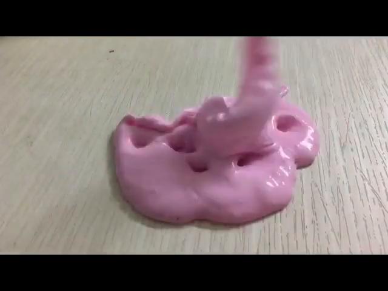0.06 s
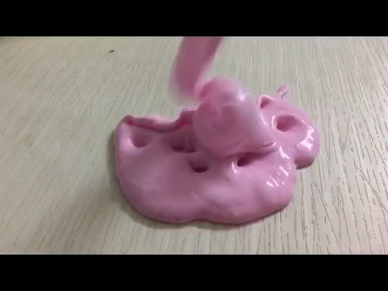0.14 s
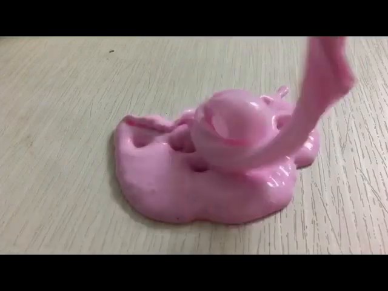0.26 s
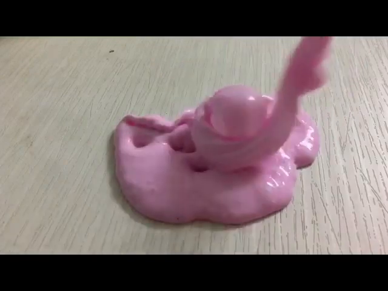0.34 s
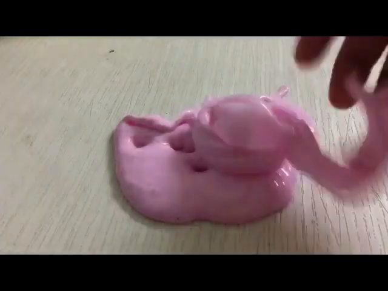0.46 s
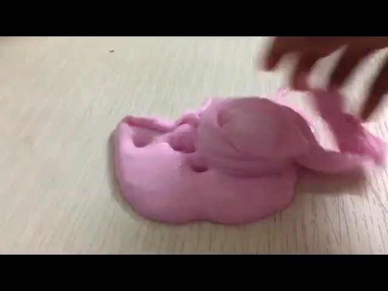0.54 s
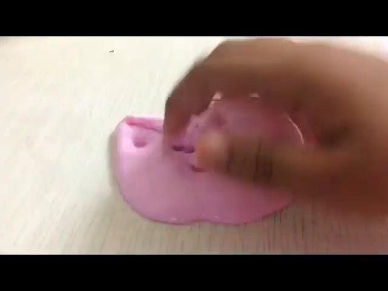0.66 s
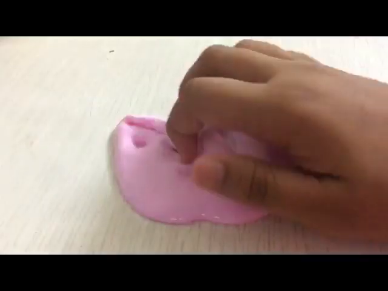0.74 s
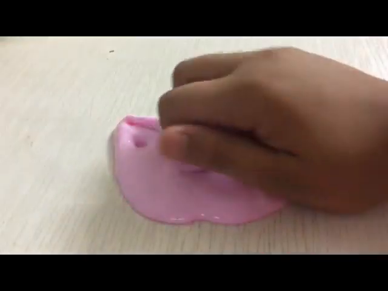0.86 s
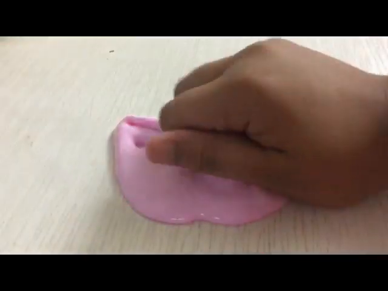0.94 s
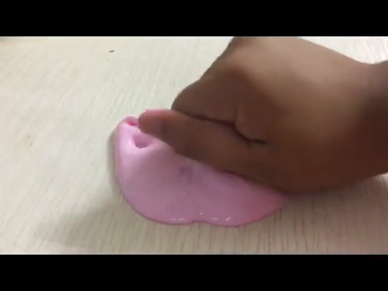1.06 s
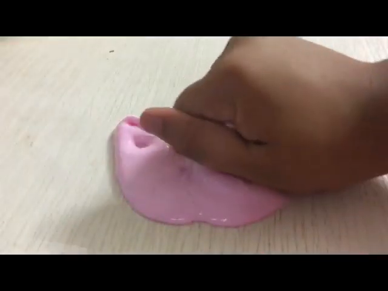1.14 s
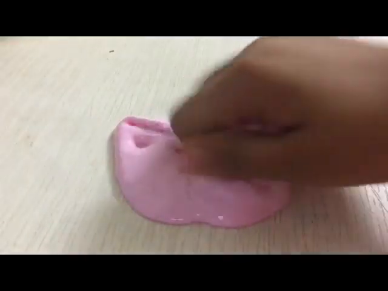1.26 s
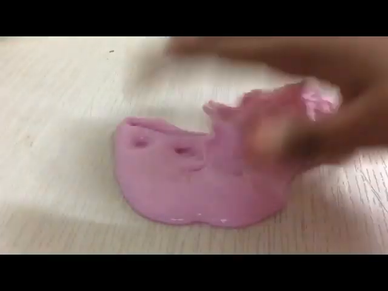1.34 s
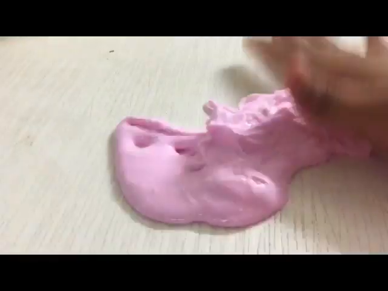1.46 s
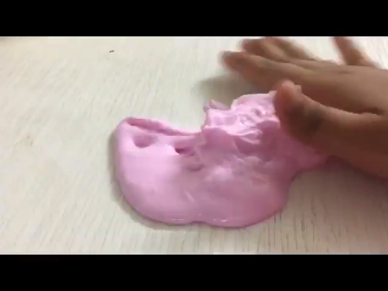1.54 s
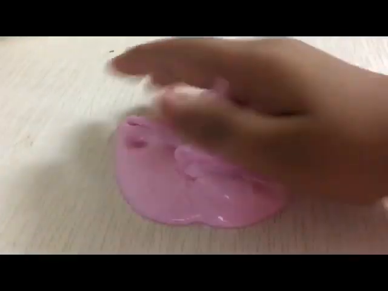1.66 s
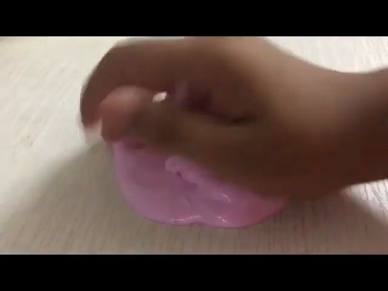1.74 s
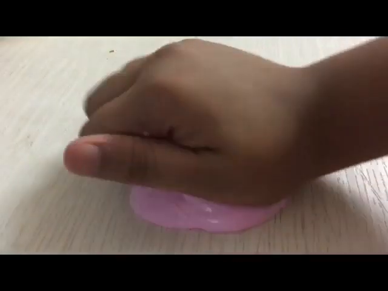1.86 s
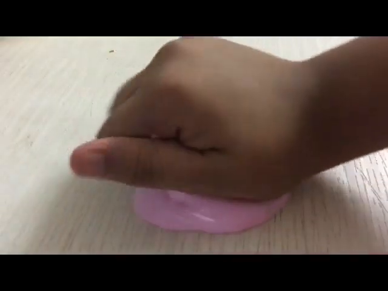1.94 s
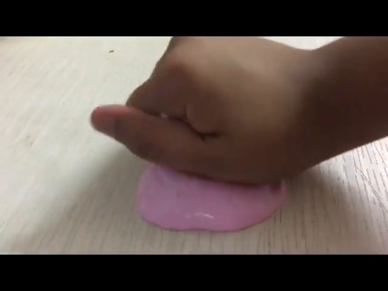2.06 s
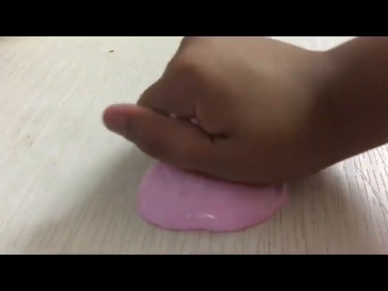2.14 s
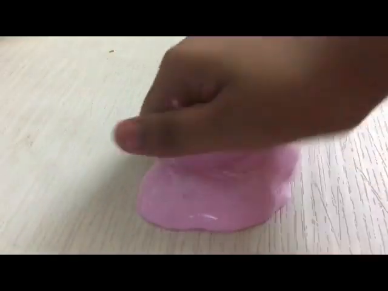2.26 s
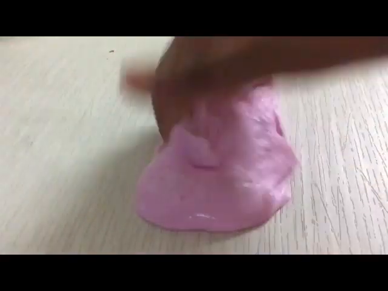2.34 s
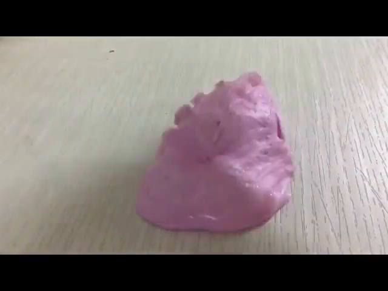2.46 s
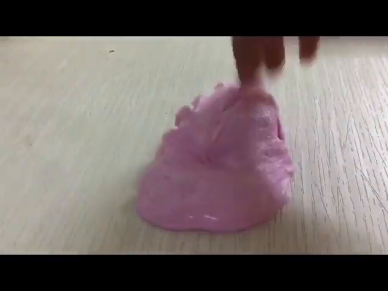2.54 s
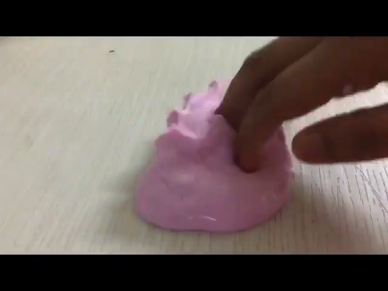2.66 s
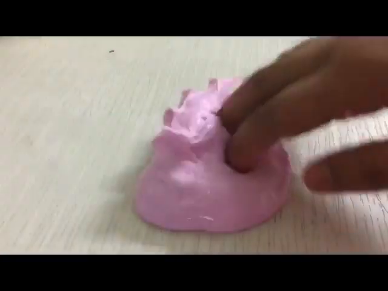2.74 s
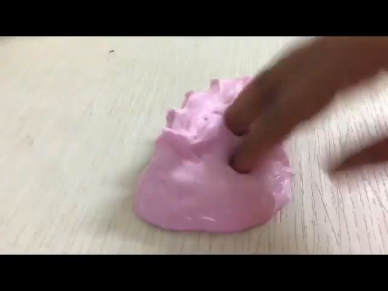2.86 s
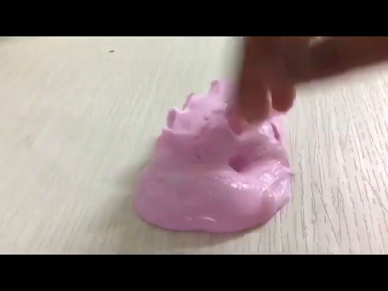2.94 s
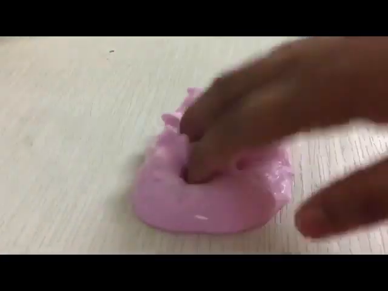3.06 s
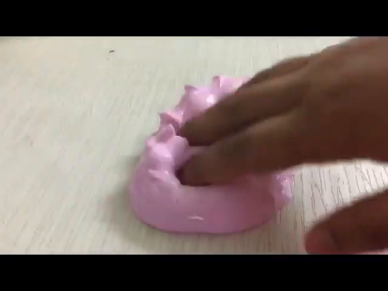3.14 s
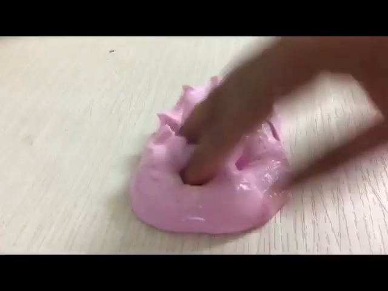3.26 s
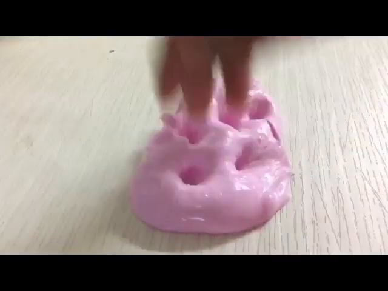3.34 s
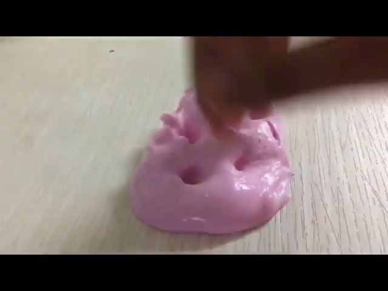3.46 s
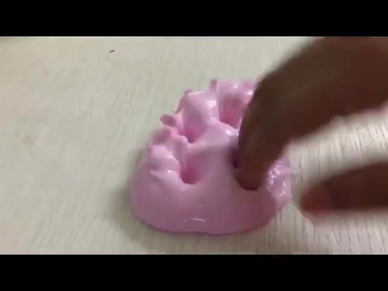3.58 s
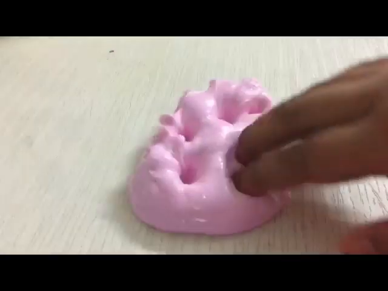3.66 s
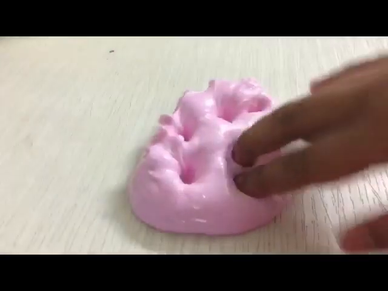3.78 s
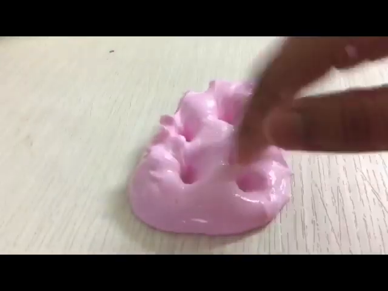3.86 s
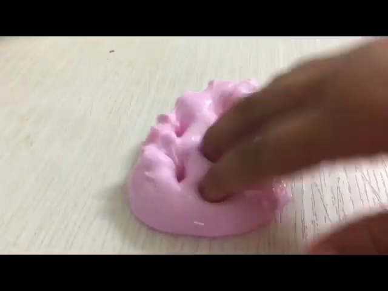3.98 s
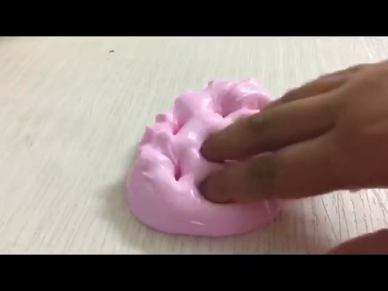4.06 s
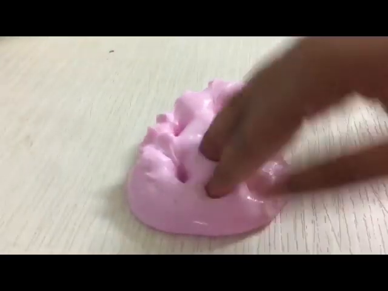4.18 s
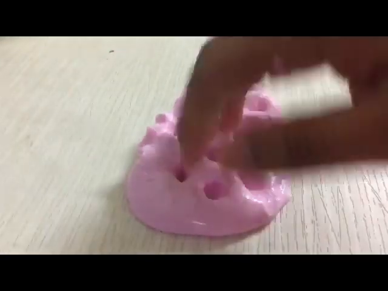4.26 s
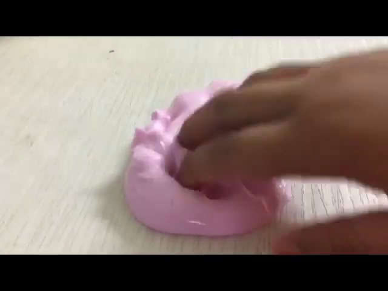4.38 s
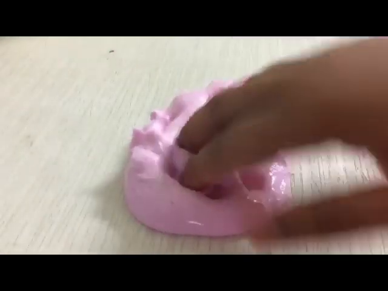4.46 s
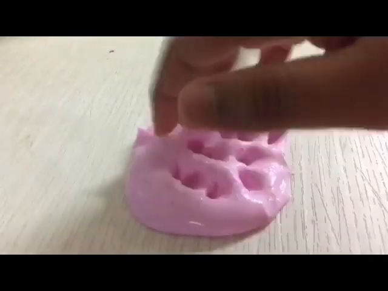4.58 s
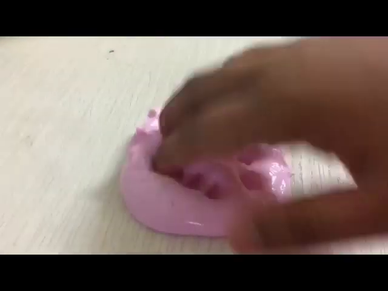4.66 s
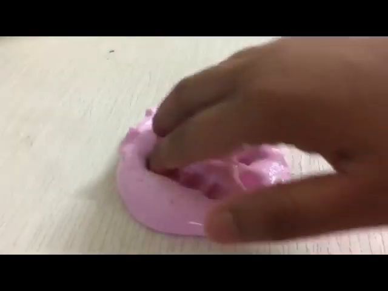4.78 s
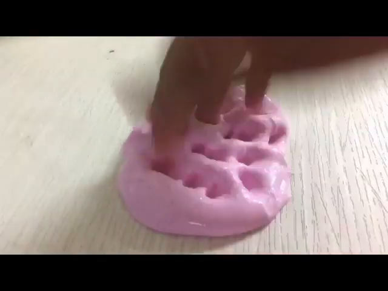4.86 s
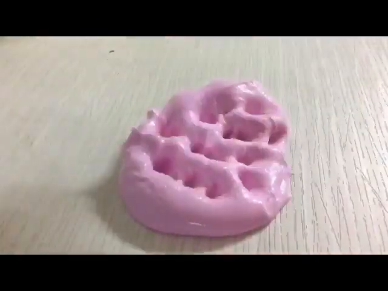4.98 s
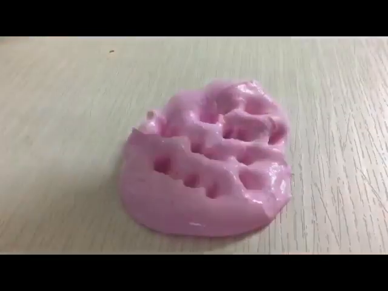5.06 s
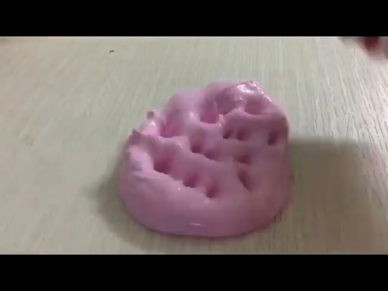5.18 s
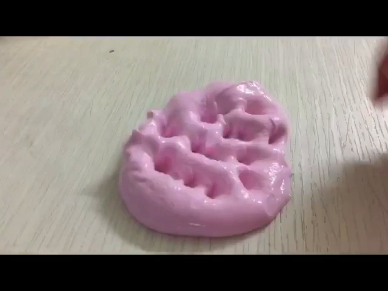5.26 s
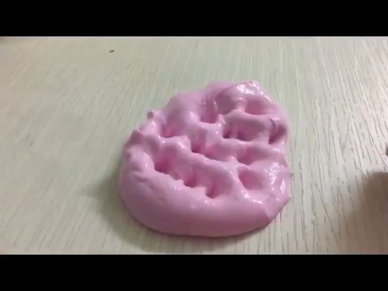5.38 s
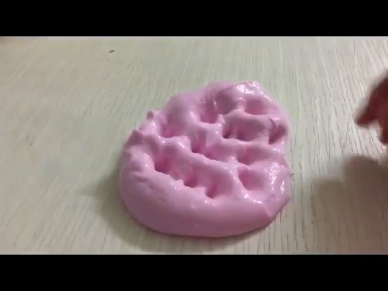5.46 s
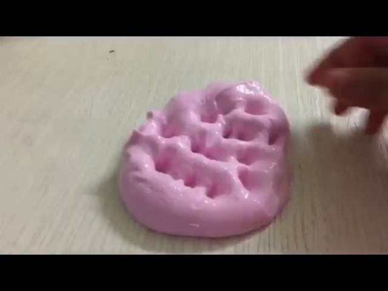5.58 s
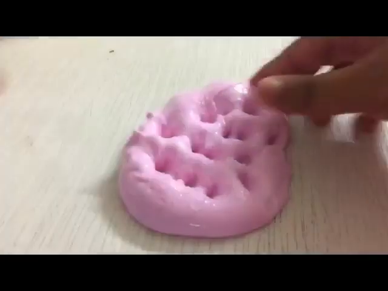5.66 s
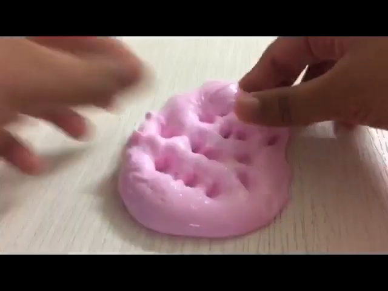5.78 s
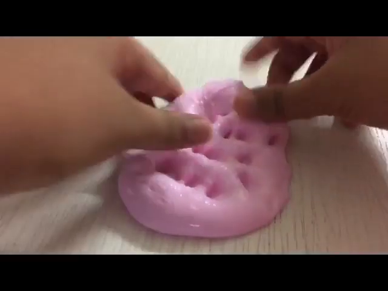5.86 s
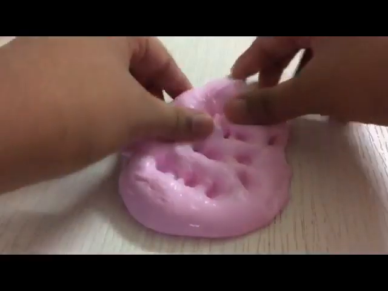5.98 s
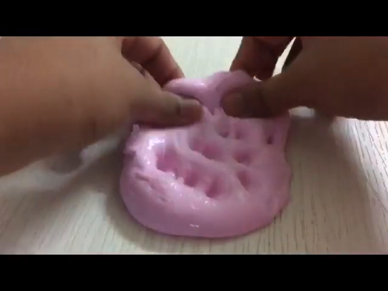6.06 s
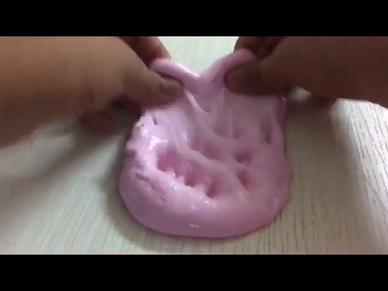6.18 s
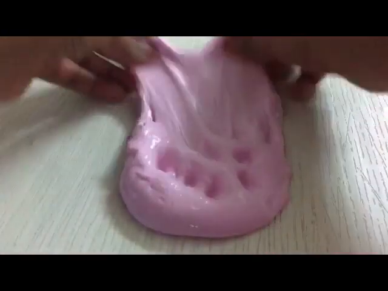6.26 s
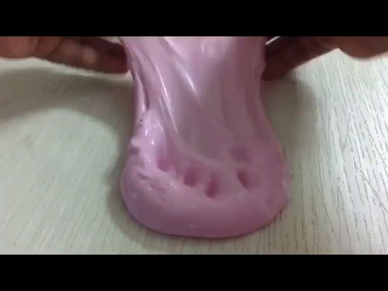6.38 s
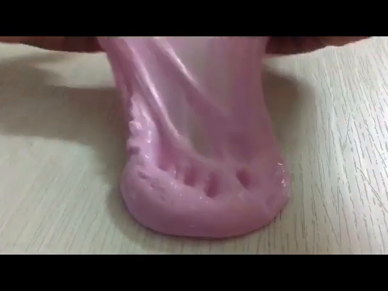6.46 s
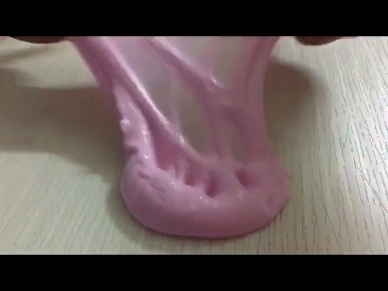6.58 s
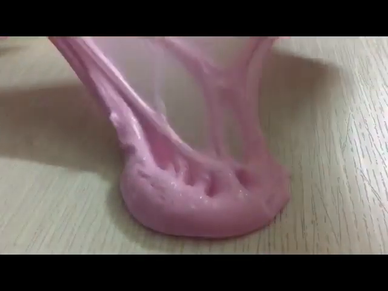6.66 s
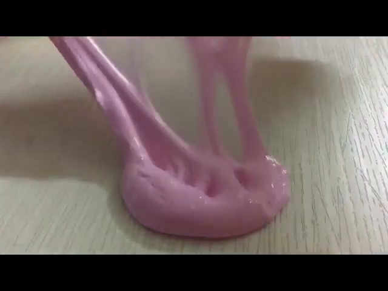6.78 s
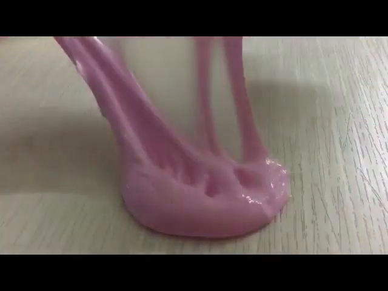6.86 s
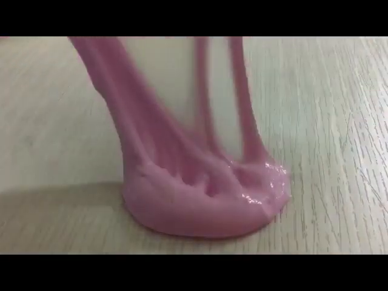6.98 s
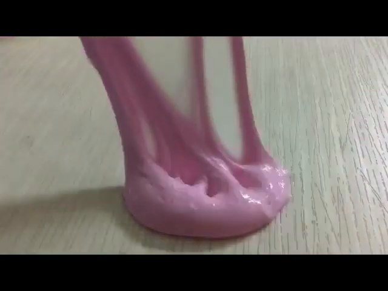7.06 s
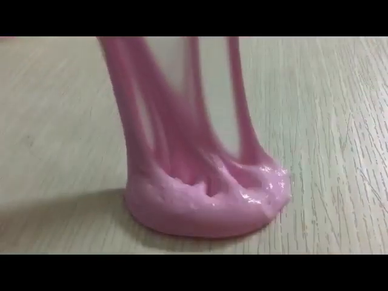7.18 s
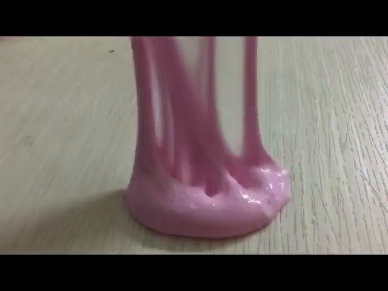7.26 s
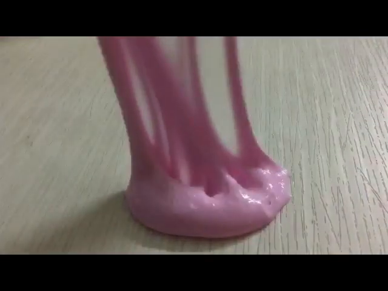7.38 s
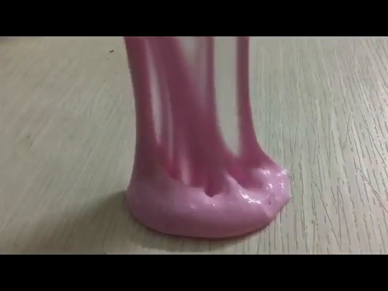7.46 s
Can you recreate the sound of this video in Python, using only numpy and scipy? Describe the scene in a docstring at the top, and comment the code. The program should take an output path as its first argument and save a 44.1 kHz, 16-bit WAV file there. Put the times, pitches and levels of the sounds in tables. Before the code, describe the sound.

Very close to the microphone in a small hard room, a hand slaps soft slime on a table and squeezes it, bursting a dense cluster of crisp air pops. A second squeeze crackles about a second later. Then fingers poke it with short hollow wet pops, spaced apart. Finally faint ticks and sticky peeling as it is stretched, over soft low hum and hiss.

```python
"""Fingers squeeze, poke and stretch soft slime on a table, close to one microphone in a small hard room.
Air pockets burst as torn noise; hollow pops snap and ring as short damped sines that sink in pitch.
Sticky skin peels with a fizz of random impulses, air hisses and squeaks as shaped noise,
and hands knock the table with falling sines and low rumble; machine hum and hiss, made of
filtered noise, lie under it all."""
import sys
import numpy as np
from scipy import signal
from scipy.fft import rfft, irfft
from scipy.io import wavfile

SR = 44100
rng = np.random.default_rng(int(sys.argv[2]) if len(sys.argv) > 2 else 0)


def unload_audio(sound):
    """Save the sound as a 16-bit wav file, at the path given as the first command line argument."""
    columns = np.transpose(np.atleast_2d(sound))
    # keep every value between -1 and 1, then stretch to whole-number steps
    steps = np.round(np.clip(columns, -1, 1) * 32767)
    wavfile.write(sys.argv[1], SR, steps.astype(np.int16))


def to_linear_factor(level_db):
    """Convert decibel levels (scalar or array-like) to linear amplitude factors."""
    exponent = np.asarray(level_db, float) / 20
    return 10 ** exponent


N = 331632


def rms_one(x):
    """Energy normalisation: scale to rms 1."""
    return x / np.sqrt(np.mean(x ** 2) + 1e-20)


def peak_one(x):
    """Amplitude normalisation: scale to peak 1."""
    return x / np.abs(x).max()


def at_hz(points, hz):
    """Logarithmic frequency scale: interpolate a (Hz, value) table along it."""
    table_hz, values = np.array(points).T
    return np.interp(np.log(hz), np.log(table_hz), values)


def band(x, low_hz, high_hz):
    """Band limiting by a Butterworth band-pass, flat between its edges."""
    edges_hz = [low_hz, min(high_hz, .45 * SR)]
    return signal.sosfilt(signal.butter(2, edges_hz, "band", fs=SR, output="sos"), x)


def coloured(x, spectrum):
    """Spectral shaping: weight a noise by frequency, then scale to rms 1."""
    hz = np.maximum(np.arange(N // 2 + 1) * SR / N, 1)
    return rms_one(irfft(rfft(x) * to_linear_factor(at_hz(spectrum, hz)), N))


def drift(rate_hz):
    """Low-passed random fluctuation: white noise through two equal poles, spread about 1."""
    step = 40  # samples between drawn values
    pole = np.exp(-2 * np.pi * rate_hz * step / SR)
    white = rng.standard_normal(N // step + 2002)
    slow = signal.lfilter([1], [1, -2 * pole, pole * pole], white)[2000:]  # settled part
    return np.interp(np.arange(N) / step, np.arange(len(slow)), rms_one(slow))


# spectrum of the room rumble, relative: pitch_hz, density_db [dB per Hz]
RUMBLE_SPECTRUM = [(15, -60.5), (25, -4.5), (102, -1.5), (147, 0.5), (167, -18.5), (200, -0.5), (220, -11),
                   (295, -7), (390, -17.5), (700, -51), (910, -50.5), (1540, -120)]
# spectrum of the room and microphone hiss, relative: pitch_hz, density_db [dB per Hz]
HISS_SPECTRUM = [(290, -48.5), (500, -4.5), (605, -0.5), (822, -5.5), (885, -1), (1120, 1), (1680, -0.5),
                 (1870, -6.5), (3110, -13.5), (4970, -42), (10300, -32), (15100, -15.5), (16500, -24.5)]
# wavering hum and whine: pitch_hz, width_hz, level_db [rms]
HUM_TONES = [(96.2, 8, -61.5), (117.9, 11, -63.5), (197.3, 8, -61.5), (296.9, 14, -69), (838, 16, -73.5),
             (1670, 14, -73.5), (14960, 27, -87), (15060, 25, -91)]
RUMBLE_DB, HISS_DB = -54.5, -62  # rms


def background():
    """Stationary noise: broad rumble and hiss, with narrow bands heard as wavering tones."""
    rumble_level = to_linear_factor(RUMBLE_DB + drift(4))
    out = rumble_level * coloured(rng.standard_normal(N), RUMBLE_SPECTRUM)
    out += to_linear_factor(HISS_DB) * coloured(rng.standard_normal(N), HISS_SPECTRUM)
    for hz, width_hz, level_db in HUM_TONES:
        tone = band(rng.standard_normal(N + SR), hz - width_hz / 2, hz + width_hz / 2)
        out += to_linear_factor(level_db) * rms_one(tone[SR:])  # the filter has settled after 1 s
    return out


# level of the faint treble hiss, rising and falling in steps: time_s, level_db
FAINT_HISS = [(0, -76), (.5, -72), (.8, -71.5), (1.3, -65.5), (1.55, -66.5), (2.05, -69), (2.25, -61.5),
              (2.55, -65), (2.59, -76.5), (2.92, -73), (3.08, -64.5), (3.3, -66.5), (3.75, -66.5),
              (3.85, -74), (4.0, -74.5), (4.24, -73.5), (4.4, -65.5), (4.9, -66.5), (5.12, -65),
              (5.38, -65.5), (5.42, -71.5), (6.3, -69), (6.7, -72.5), (7.52, -75.5)]
# tint of the faint hiss: pitch_hz, gain_db
FAINT_HISS_TINT = [(1060, 1.5), (3700, -7), (7400, -3.5), (12600, -1.5)]
# air hissing out of the squeezed lump, sudden and dying away:
# start_s, level_db, centre_hz, fade_db_per_s
JETS = [(1.06, -24, 12570, 901), (1.109, -30, 7010, 160.), (2.114, -26, 7500, 163)]
# sticky skin parting from slime: start_s, length_s, level_db [at 4 kHz], brightness_db_per_octave
PEELS = [(.600, 0.023, -71, 0), (.880, 0.15, -65, 6), (1.330, .035, -48, -0.3), (1.361, 0.029, -46, -0.8),
         (1.600, 0.082, -65, 0.5), (2.328, 0.061, -53, 3), (2.388, 0.069, -55, 0), (5.932, .015, -64.5, 1),
         (3.888, 0.011, -63, 1), (4.952, 0.011, -59.5, 0.6), (5.700, .12, -72, -0.6),
         (6.340, 0.079, -65.5, 1.6), (6.150, .17, -75, 5), (6.537, .065, -79.5, 5),
         (6.881, .22, -78.5, 2.5)]
JET_RISE_DB_PER_S, JET_SLOPE_DB_PER_OCTAVE = 3500.5, 10  # the slope falls away from the centre
PEEL_RISE_DB_PER_S, PEEL_FALL_DB_PER_S = 701.5, 603


def hissing_db(hz):
    """Incoherent addition: powers of faint hiss, air jets and peels sum to a level at one pitch."""
    t = np.arange(N) / SR
    power = to_linear_factor(2 * (np.interp(t, *np.transpose(FAINT_HISS)) + at_hz(FAINT_HISS_TINT, hz)))
    for start, level_db, centre_hz, fade in JETS:
        away_db = JET_SLOPE_DB_PER_OCTAVE * abs(np.log2(hz / centre_hz))
        edge_db = np.maximum(fade * (t - start), JET_RISE_DB_PER_S * (start - t))
        power = power + to_linear_factor(2 * (level_db - away_db - edge_db))
    for start, length, level_db, bright in PEELS:
        before_db = PEEL_RISE_DB_PER_S * (start - t)
        after_db = PEEL_FALL_DB_PER_S * (t - start - length)
        edge_db = np.maximum(0, np.maximum(before_db, after_db))
        power = power + to_linear_factor(2 * (level_db + bright * np.log2(hz / 4000) - edge_db))
    return 10 * np.log10(power)


# limits of the adjoining peel bands: edge_hz
PEEL_EDGES = (450, 2500, 5500, 10000, 16000)
THREADS_PER_S = (990, 1800, 2900, 2490)  # per band, before clumping
SWELL_DB = 1.8  # hard peeling comes in uneven swells


def peeling():
    """Random impulse process: tiny threads snap in clumps as skin and slime part, amid faint hiss."""
    out, clumps, swells = 0, drift(110), drift(44)
    for low_hz, high_hz, per_s in zip(PEEL_EDGES, PEEL_EDGES[1:], THREADS_PER_S):
        level_db = hissing_db(np.sqrt(low_hz * high_hz))
        born = rng.random(N) < per_s * to_linear_factor(2.0 * clumps) / SR
        strength = to_linear_factor(2.8 * np.minimum(rng.exponential(1, N), 5))
        threads = born * strength * rng.choice([-1, 1], N)
        # faint hiss is smooth, hard peeling crackles
        wet = np.clip((level_db + 72.5) / 15, 0, 1)
        smooth = np.sqrt(1 - 0.97 * wet ** 2) * rng.standard_normal(N)
        mixed = wet * rms_one(threads) + smooth
        moving_db = level_db + 0.86 * drift(30) + SWELL_DB * wet * swells
        out = out + to_linear_factor(moving_db) * rms_one(band(mixed, low_hz, high_hz))
    return out


def tearing(draw, tear_ms):
    """Film rupture: noise swells for 2 ms, then snaps, and the film gives way in uneven jerks."""
    t = np.arange(draw.shape[1]) / SR - .002
    lead_in = .17 * np.exp(t / .0012)
    snap = np.exp(-np.abs(t) / .00015)
    yielding = .32 * np.exp(-np.abs(t) / (tear_ms * .0011))  # time constant 1.1 times tear_ms
    uneven = draw[0] * np.exp(.5 * draw[1])
    tear = uneven * np.where(t < 0, lead_in, snap + yielding)
    tear[88:90] += [4.6, -4.6]  # click of the snap itself
    return tear


def loudness_one(x):
    """Short-time energy: scale so that the 2.5 ms round the snap have rms 1."""
    return x / np.sqrt(np.mean(x[78:188] ** 2))


# pockets bursting in the kneading fist:
# start_s, treble_db [snap], dullness_db [2-6 kHz over the snap], centre_hz [snap],
# tear_ms [scale of the tearing time]
BURSTS = [(0.551, -55, -8, 11000, 1.1), (0.6157, -46, -11, 12700, 1.2), (0.6222, -52, -10, 14300, 1.3),
          (0.8644, -46.5, -4.5, 6300, 0.8), (0.9433, -46, 5, 12500, 1.7), (0.9631, -44.5, 9, 5460, 0.9),
          (1.05, -37.5, 9, 5330, 1.1), (1.0575, -22, 5, 6900, 3.0), (1.0605, -21.5, -14, 5630, 2.1),
          (1.0677, -23.5, -3, 7750, 2.5), (1.0759, -26, -5, 6780, 1.4), (1.0957, -35, 6, 5270, 1.9),
          (1.1026, -17.5, 1.5, 14340, 0.7), (1.1087, -17.5, -13, 14300, 0.8), (1.117, -22, 6.5, 5810, 0.9),
          (1.1245, -18.5, -15.5, 5875, 0.9), (1.1375, -27, -20.5, 5660, 1.1),
          (1.1431, -24.5, -27, 13830, 3.0), (1.1463, -18.5, -15, 13640, 1.5), (1.1551, -22, -13, 6980, 0.7),
          (1.1888, -28.5, 0, 14410, 1.6), (1.2302, -16.5, -13.5, 14500, 1.3),
          (1.247, -19, -14.5, 14740, 0.6), (1.4048, -39, -18, 14240, 2.1), (1.4584, -52, -3.5, 13600, 2.2),
          (1.5722, -47.5, 0, 5500, 4.4), (1.6795, -56, -12, 10500, 3.0), (1.7165, -51.5, -12, 11000, 3.0),
          (1.7959, -50.5, -12.5, 13700, 0.9), (1.924, -46.5, -12.5, 14700, 0.8),
          (1.9867, -33, -16.5, 13400, 0.9), (2.0168, -41.5, -9, 14100, 0.6),
          (2.0781, -40.5, -15.5, 12900, 1.1), (2.0866, -50, -2.5, 5430, 2.3),
          (2.0983, -50.5, 5.5, 5500, 2.8), (2.1099, -13.5, -4.5, 7500, 2.8), (2.123, -16.5, -20, 7500, 1.2),
          (2.1268, -24, -6.5, 7400, 1.1), (2.1358, -21.5, -7.5, 14300, 0.9),
          (2.1446, -22.5, -5, 14420, 1.7), (2.1623, -17.5, -6.5, 7700, 0.7), (4.036, -56.5, -8, 12100, .9),
          (5.711, -64, 4, 7000, 1.9), (6.0165, -68, 4, 7000, 0.8), (6.0425, -45, -9.5, 7600, 0.8),
          (6.0647, -57, 5, 6540, 1.9), (6.118, -57, -6, 9000, 0.8), (6.2737, -35.5, -10.5, 6600, 1.1),
          (6.3096, -48, -18, 13600, 2.8), (6.3836, -51, -1, 11700, 2.3), (6.577, -57, -1, 9100, 0.8)]
BODY_DB = -11.5  # the lump's thud under the 2-6 kHz snap


def bursts():
    """Non-resonant rupture: small pockets snap without ringing; size sets where treble gathers."""
    out = np.zeros(N + 1500)
    draws = rng.standard_normal((len(BURSTS), 2, 1500))
    for (start, treble_db, dull_db, hz, tear_ms), draw in zip(BURSTS, draws):
        tear = tearing(draw, tear_ms)
        treble = band(band(tear, .78 * hz, 1.25 * hz) + .3 * tear, 5500, 17000)
        middle = band(band(tear, 2300, 6500), 1800, 7500)
        body = band(band(tear, 450, 1800), 350, 2200)
        dull = loudness_one(middle) + to_linear_factor(BODY_DB) * loudness_one(body)
        i = round(start * SR) - 88  # the lead-in comes first
        out[i:i + 1500] += to_linear_factor(treble_db) * (loudness_one(treble) + to_linear_factor(dull_db) * dull)
    return out[:N]


# hands knocking the table:
# start_s, slap_db [peak], ring_hz [table], rumble_db [peak], rumble_t60_s
KNOCKS = [(0.875, -53, 60, -42, 0.3), (.9628, -14, 260, -22.5, 0.067), (1.054, -33.5, 282, -46, 0.02),
          (1.0925, -29, 290.6, -44, .06), (1.38, -41, 98, -40, 0.22), (1.5714, -29.5, 228, -38.5, 0.29),
          (1.605, -37, 110.1, -38, 0.61), (3.375, -34, 250, -33, 0.11), (3.4, -38.5, 230, -31.5, 0.11),
          (5.711, -46, 232, -50, 0.11), (5.9164, -34.5, 340, -33, 0.13)]
SLAP_DROP_HZ = 41000  # pitch drop per unit of slap energy: only hard slaps start high


def knocks():
    """Impact and damped response: a slap drops in pitch as flesh spreads, then the table rumbles."""
    out, t = np.zeros(N + 20000), np.arange(20000) / SR
    noises = rng.standard_normal((len(KNOCKS), 20000))
    for (start, slap_db, hz, rumble_db, t60), noise in zip(KNOCKS, noises):
        falling_hz = hz + SLAP_DROP_HZ * to_linear_factor(2 * slap_db) * np.exp(-t / 0.0012)
        turns = np.cumsum(falling_hz) / SR
        push = np.sin(2 * np.pi * turns) * (1 - np.exp(-t / 0.001)) * np.exp(-turns / .8)
        rumble = band(noise * to_linear_factor(-60 * t / t60), .5 * hz, 1.2 * hz)
        i = round(start * SR)
        out[i:i + 20000] += to_linear_factor(slap_db) * peak_one(push) + to_linear_factor(rumble_db) * peak_one(rumble)
    return out[:N]


# hollow ringing pops, finger holes opening and wet plops of the kneaded lump:
# start_s, treble_db [snap], dullness_db [2-6 kHz over the snap],
# ring_db [hollow ring, peak; played 1 dB lower], ring_hz [pitch it sinks to]
POPS = [(1.0279, -51, 6.5, -31.5, 1000), (1.0909, -32.5, -9.5, -23, 690), (2.421, -52, -2, -36.5, 564),
        (2.4448, -46, -2, -36.5, 990), (2.9715, -16, -7.5, -14.5, 567), (2.9895, -69, -21, -40.5, 860),
        (2.9941, -16.5, -2, -16.5, 602), (2.9965, -25.5, -5, -38, 1010), (3.003, -37, 7.5, -24.5, 924),
        (3.0069, -32.5, -8.5, -33.5, 993), (3.1375, -33.5, -8.5, -40.5, 1120),
        (3.3734, -15.5, -8.5, -11, 572), (3.3967, -14, -5, -14, 1295), (3.3956, -17, -8, -11, 697),
        (3.8117, -65.5, 12, -62, 1570), (3.9001, -27, -6.5, -19.5, 900), (3.9253, -26.5, -3.5, -16.5, 990),
        (3.939, -30, -7.5, -18.5, 943), (4.2763, -19.5, -8.5, -22.5, 1040),
        (4.2775, -19, -4.5, -14.5, 1026), (4.281, -39.5, 6.5, -25, 849), (4.2902, -25.5, 4.5, -15.5, 770),
        (4.2928, -32, 1.5, -13.5, 694), (4.596, -38.5, -2.5, -41, 1750), (4.601, -27.5, 0.5, -22, 946),
        (4.6207, -23, 6, -26, 790), (4.6231, -19, -15, -18.5, 670), (4.6254, -27.5, 0, -40.5, 856),
        (4.6275, -26, -7.5, -23.5, 910), (4.6362, -29.5, -1.5, -17.5, 1047), (4.9551, -14, -8, -14, 823),
        (4.9576, -11, -3, -12, 945), (4.9749, -25, -3.5, -25, 1160), (4.9923, -7.5, -18, -12, 907),
        (5.9156, -52.5, 5.5, -32, 810)]
RING_S = .0024  # decay time constant: the wet walls damp every pop alike
# scale of a dull, thick film's tearing time; e times quicker per so much less dullness
THICK_TEAR_MS, THINNING_DB = 1.9, 15


def pops():
    """Damped cavity resonance: finger holes and wet plops snap, then ring hollow, sinking in pitch."""
    out, t = np.zeros(N + 1600), np.arange(1500) / SR
    draws = rng.standard_normal((len(POPS), 4, 1500))
    for (start, treble_db, dull_db, ring_db, hz), draw in zip(POPS, draws):
        tear = tearing(draw, THICK_TEAR_MS * np.exp(min(dull_db, 3) / THINNING_DB))
        middle = band(band(tear, 1800, 6000), 1500, 7000)
        treble = band(tear, 5500, 17000)
        snap = to_linear_factor(dull_db) * loudness_one(middle) + loudness_one(treble)

        turns = np.cumsum(hz * (1 + 0.8 * np.exp(-t / 0.00079))) / SR
        swell = (1 - np.exp(-t / 0.0014)) * np.exp(-t / RING_S)
        overtone = 0.61 * np.sin(2 * np.pi * 1.2 * turns + draw[3, 0])
        ring = (np.sin(2 * np.pi * turns) + overtone) * swell
        # the collapsing walls blur the ring
        wobble = band(draw[2] * swell * np.exp(-t / 0.003), 500, 1300)
        ring = peak_one(ring) + .8 * peak_one(wobble)
        ring = band(band(ring, 400, 5500), 150, 6800)  # so small an opening radiates little bass

        i = round(start * SR)
        out[i - 88:i + 1412] += to_linear_factor(treble_db) * snap
        out[i:i + 1500] += to_linear_factor(ring_db - 1.0) * peak_one(ring)
    return out[:N]


# breathy squeaks, air through a slit or skin on the table:
# start_s, end_s, first_hz, last_hz, width_hz, level_db [rms before the fades]
SQUEAKS = [(1.068, 1.080, 6400, 7100, 500, -26), (1.330, 1.368, 2950, 2850, 300, -52),
           (5.68, 5.86, 2790, 2920, 300, -66.5), (5.72, 5.85, 4400, 4500, 500, -73)]


def squeaks():
    """Quadrature modulation: narrow noise shifted up to a gliding pitch, fading in and out."""
    out = np.zeros(N)
    noises = rng.standard_normal((len(SQUEAKS), 2, SR // 2))
    for (start, end, first_hz, last_hz, width_hz, level_db), noise in zip(SQUEAKS, noises):
        i, n = round(start * SR), round((end - start) * SR)
        low_pass = signal.butter(2, width_hz / 2, fs=SR, output="sos")
        slow = signal.sosfilt(low_pass, noise)[:, 2000:2000 + n]
        phase = 2 * np.pi * np.cumsum(np.linspace(first_hz, last_hz, n)) / SR
        breath = rms_one(slow[0] * np.cos(phase) + slow[1] * np.sin(phase))
        out[i:i + n] += to_linear_factor(level_db) * breath * np.hanning(n) ** .5
    return out


# reverberation time of the tail: pitch_hz, t60_s
ROOM_T60 = [(200, 0.13), (800, 0.34), (3000, 0.29), (12000, 0.31)]
# tint of the tail: pitch_hz, gain_db
ROOM_TINT = [(200, 14), (1000, 6.5), (4000, 2.5), (12000, -1)]
TAIL_DB, WALL_DB, WALL_S = -18, -19, .013


def room(x):
    """Reflection and reverberation: one wall echo, and octave bands of noise each decaying alone."""
    t, edges = np.arange(SR // 2) / SR, 70 * 2. ** np.arange(9)
    tail = 0
    for low, high in zip(edges, edges[1:]):
        middle_hz = np.sqrt(low * high)
        decay_db = -60 * t / at_hz(ROOM_T60, middle_hz) + at_hz(ROOM_TINT, middle_hz)
        tail = tail + band(rng.standard_normal(len(t)), low, high) * to_linear_factor(decay_db)
    tail *= 1 - np.exp(-(t / 0.0052) ** 2)  # reflections build up
    tail /= np.sqrt(np.sum(tail ** 2))
    returned = band(x, 4500, 22000) + 0.22 * x  # the wall returns mostly treble
    echo = to_linear_factor(WALL_DB) * np.roll(returned, round(WALL_S * SR))
    return echo + to_linear_factor(TAIL_DB) * signal.fftconvolve(x, tail)[:N]


def scene():
    """Superposition: slime and hands in the room, over peeling and background."""
    near = bursts() + pops() + squeaks() + knocks()
    return (near + room(near) + peeling() + background())[None]


def band_limit(x):
    """A steep low-pass at the top of the band."""
    return signal.sosfilt(signal.butter(12, 17040, fs=SR, output="sos"), x)


# microphone dips: pitch_hz, width_hz, gain_db
MIC_DIPS = [(4950, 900, -3), (10520, 370, -4)]
BASS_CUT_HZ, TOP_CUT_HZ = 42, 16800


def record(dry):
    """Linear filtering and saturation: microphone dips, rounded peaks, then top and bass cuts."""
    for hz, width_hz, gain_db in MIC_DIPS:
        peak = signal.lfilter(*signal.iirpeak(hz, hz / width_hz, SR), dry)
        dry = dry - (1 - to_linear_factor(gain_db)) * peak
    rounded = .85 * np.tanh(1.12 * dry / .85)
    top_cut = signal.cheby2(10, 35, TOP_CUT_HZ, fs=SR, output="sos")
    bass_cut = signal.butter(3, BASS_CUT_HZ, "high", fs=SR, output="sos")
    mix = signal.sosfilt(bass_cut, signal.sosfilt(top_cut, rounded))
    return band_limit(mix)


dry = scene()
out = record(dry)
unload_audio(out)
```